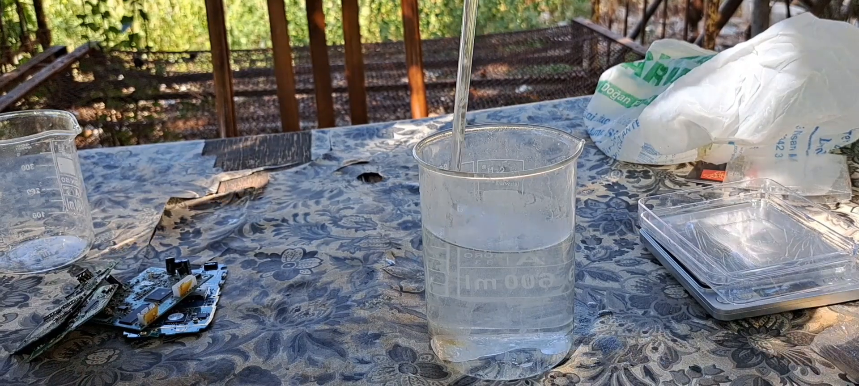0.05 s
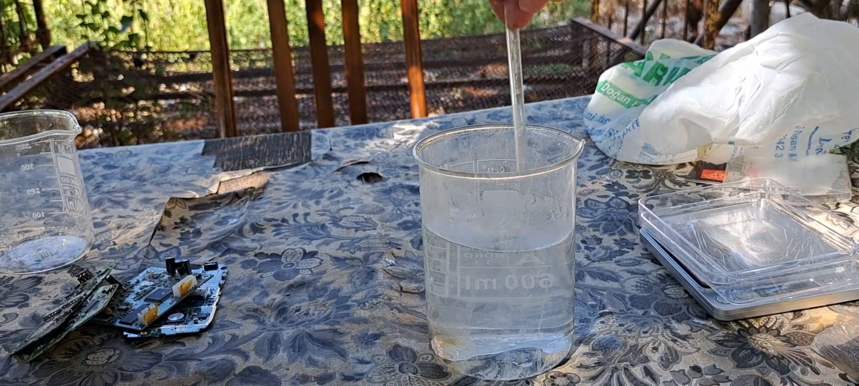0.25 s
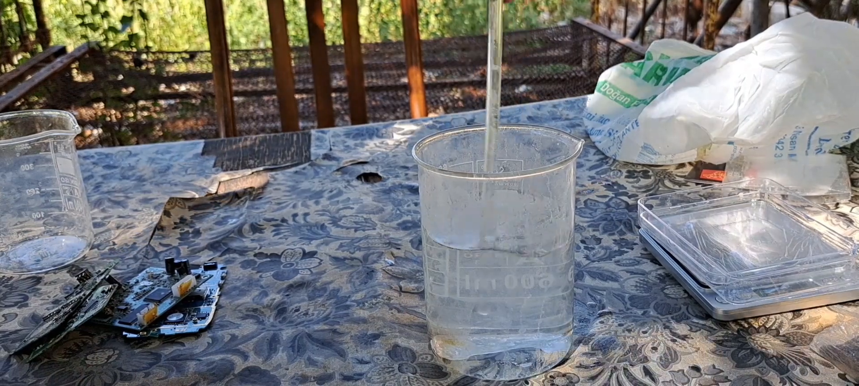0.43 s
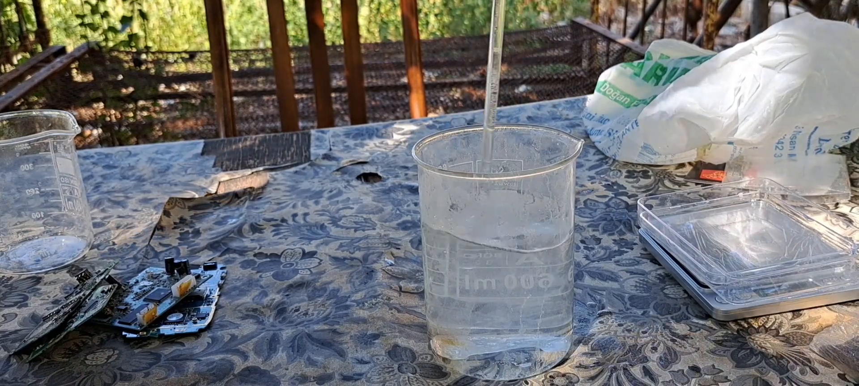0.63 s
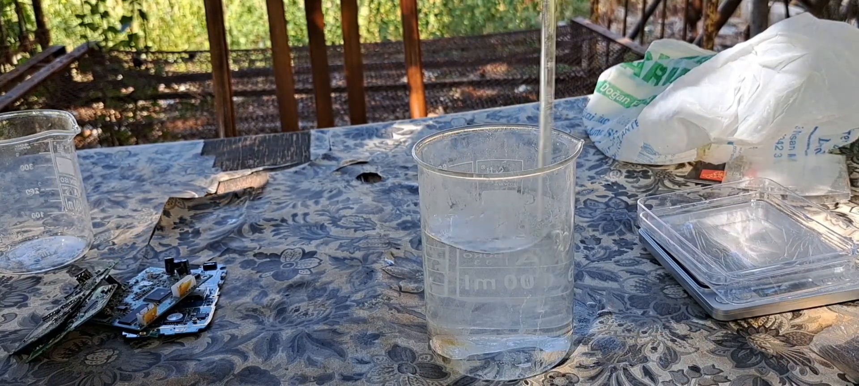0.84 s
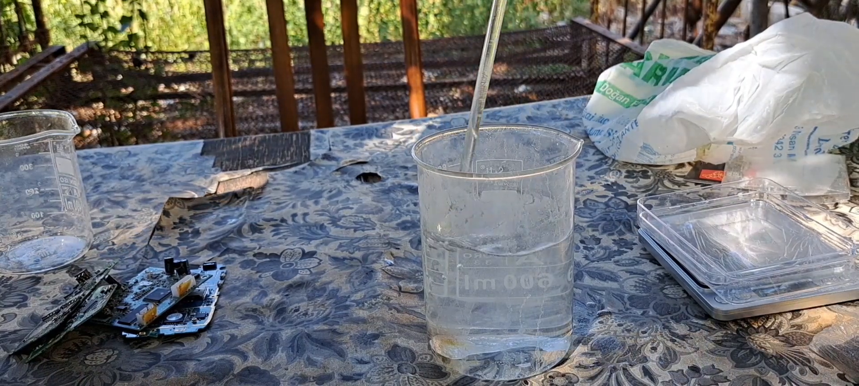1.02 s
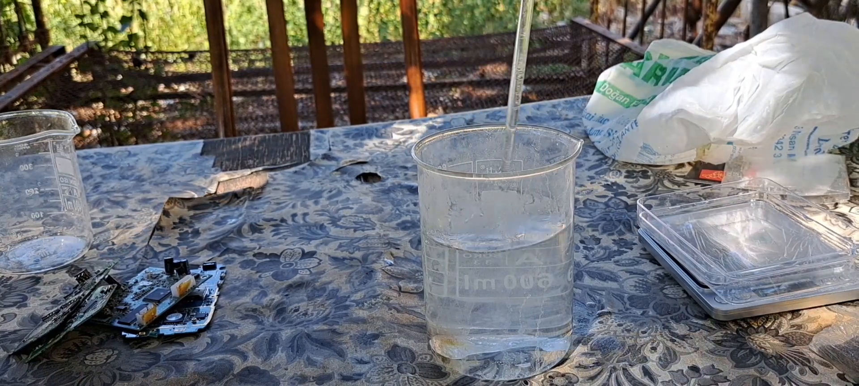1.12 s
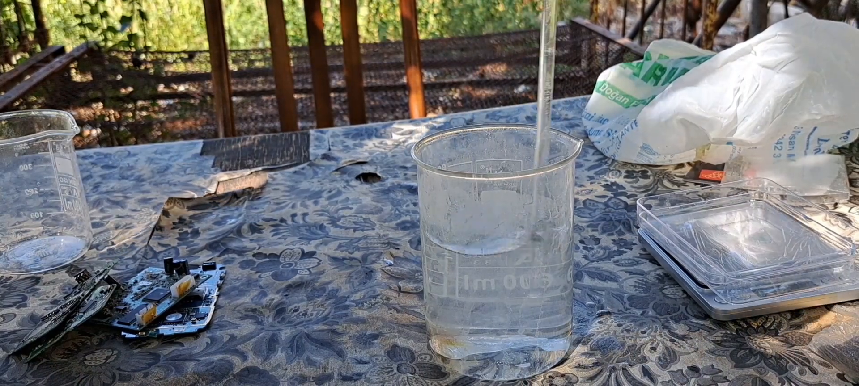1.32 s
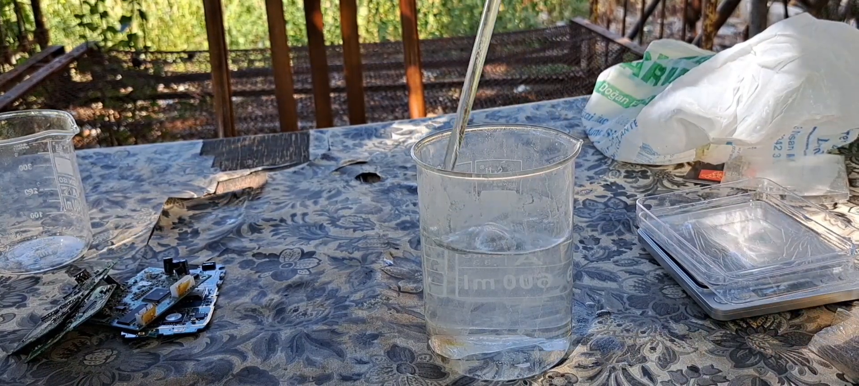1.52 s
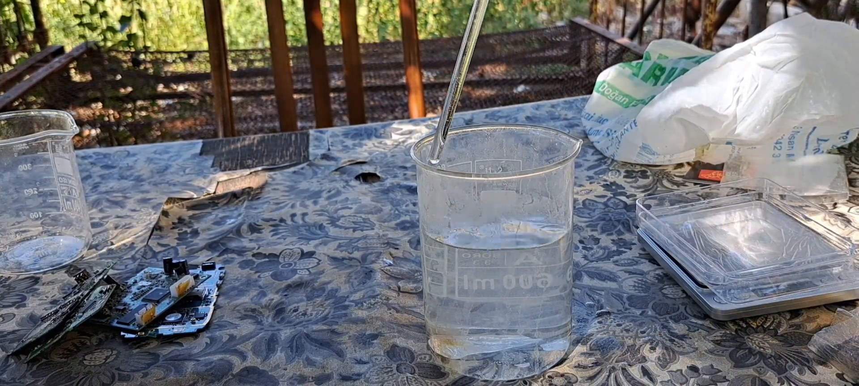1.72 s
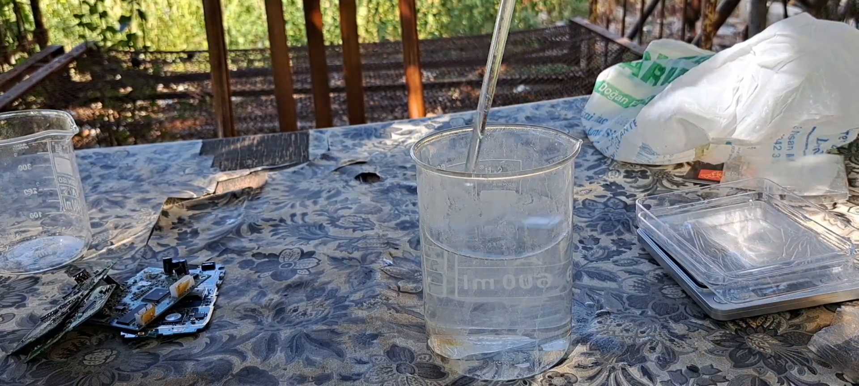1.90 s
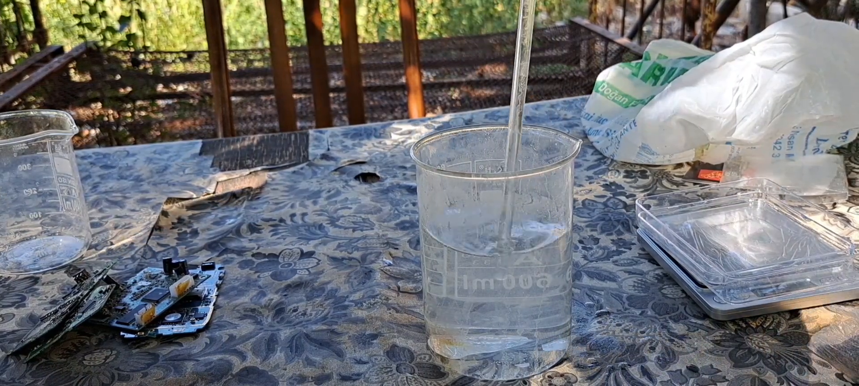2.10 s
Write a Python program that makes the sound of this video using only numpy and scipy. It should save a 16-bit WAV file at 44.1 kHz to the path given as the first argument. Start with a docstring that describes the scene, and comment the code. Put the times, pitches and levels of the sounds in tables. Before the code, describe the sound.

Bright, uneven clinks of a glass rod stirring water in a beaker.

```python
"""An outdoor table: a glass rod stirs water in a glass beaker.
The rod clacks against the wall, bounces and slides along it; the wall rings in close pairs of modes.
The water gurgles once as bubbles ring, and beaker and table give a few dull knocks.
Nearby things scatter a short echo. Rumble, a low hum and a soft hiss lie behind."""
import sys
import numpy as np
from scipy import signal
from scipy.fft import rfft, irfft
from scipy.io import wavfile

SR = 44100
rng = np.random.default_rng(int(sys.argv[2]) if len(sys.argv) > 2 else 0)


def store_wav(level_fs):
    """Save 16-bit WAV to argv[1]."""
    pcm = np.round(np.clip(np.atleast_2d(level_fs), -1, 1) * 32767)
    wavfile.write(sys.argv[1], SR, pcm.T.astype(np.int16))


N = 94815
T = np.arange(int(.8 * SR)) / SR  # time within one event
CONTACT_HZ, CONTACT_ATTACK_S = 7660, 0.00059  # main rod-wall contact mode


def clinks():
    """Each blow of the rod clacks and sets the wall ringing; some add a ping."""
    # t/s; ring: level/dB, tilt/(dB/oct), twin bias/dB, lowest pair/dB, t60 factor;
    # clack: level/dB, tilt/(dB/oct), pitch factor, main mode/dB, snap/dB, t60 factor
    blows = [ (0.2039, -23.5, 6.5, -7.5, -2, 1.3, -5.5, 1.5, 1.014, -7, -6.5, 1),
             (0.2354, -22.5, -3.5, -3.5, -4, 1.3, -8, 1, 1.01, -1, -8, 0.84),
             (0.2473, -29.5, -1, 7, 6.5, 0.92, -22.5, -2, 0.93, 2.5, -11, .9),
             (0.5035, -31.5, -7, 4.5, 2, 1.1, -9.5, 3.5, 0.99, 1.5, -17, 0.56),
             (0.523, -26.5, -2.5, 5.5, -4, 1.25, -10, 0, 1.0, 2.5, -28, 0.8),
             (0.5314, -43, 7, -3.5, -1, 1.1, -22, -1, 0.98, 9.5, -10, 0.49),
             (0.75, -50, -4, 9, -23, 0.56, -43.5, -7, 0.98, 9.5, -4, 1),
             (0.9236, -25.5, 13, 0.5, -1, 0.47, -6, 2, 0.99, -3, -27, 0.75),
             (0.9342, -30, 11, -6, -1, .7, -15.5, -4, 0.99, 2.5, -23, .7),
             (0.9607, -46, -2, -4, -9, 0.5, -38, -4, 1.3, -3, -10, .6),
             (0.981, -31.5, -5.5, -0.5, 8, 0.57, -33, -12.5, 0.95, 9, -19, 0.76),
             (0.986, -31, 6, -1, 2, 0.81, -19, -3.5, 1.01, 7, -21, .7),
             (1.043, -56.5, 17, 4, 9, 0.82, -45, -4, 0.96, 2, -4, .6),
             (1.4245, -32.5, -6.5, 5, 10, 0.51, -28, -5.5, 1.01, -10, 1, .6),
             (1.4453, -33.5, -7.5, -5, 1.5, 0.32, -34.5, -11, 0.9, -17, -6, 0.54),
             (1.4794, -40, 2, 6, -18, 0.48, -30, 2, 0.91, -6, -7, .6),
             (1.483, -22.5, -5.5, 2.5, -29, 0.92, -9, -0.5, .972, -1.5, -6, .8),
             (1.7027, -20.5, 5, 5.5, 0.5, 0.73, -9.5, -1.5, 0.99, -5, -8, 0.74),
             (1.7333, -41, 7, 5, 0, 0.64, -27, -6.5, 1.02, 2, -10, .7),
             (1.7419, -29, -4, -5, -2.5, 0.88, -45, -13.5, 0.87, -6, -11, .8)]
    # pitch set by where the rod touches: t/s, f/Hz, level/dB, t60/s, spread/Hz
    pings = [(.041, 2520, -28, 0.021, 1050), (0.2054, 5690, -18, 0.086, 34), (.2351, 5680, -29, 0.062, 40),
             (0.204, 4090, -23, 0.18, 7.5), (0.7493, 3335, -32, 0.05, 81), (0.749, 5680, -36.5, 0.073, 29),
             (0.987, 4470, -27.5, 0.18, 13), (1.2483, 13800, -29.5, .012, 1300),
             (1.3947, 7540, -39, 0.023, 700), (1.4248, 8780, -18.5, 0.016, 270),
             (1.4446, 3406, -29.5, 0.057, 67), (1.4451, 8700, -25, .022, 400),
             (1.483, 4970, -12, 0.024, 40), (1.484, 7050, -20.5, 0.083, 43),
             (1.482, 11900, -14.5, 0.023, 510), (1.7018, 5820, -23, .05, 120),
             (1.7021, 8120, -12.5, 0.034, 320), (1.7027, 3272, -24.5, 0.15, 18.4)]
    out = np.zeros(N)
    for s, ring_db, tilt_db_oct, twin_db, lowest_db, t60_factor, clack_db, *clack_timbre in blows:
        ring = wall_ring(tilt_db_oct, twin_db, lowest_db, t60_factor)
        add(out, s, from_db(ring_db) * choked(s, ring))
        add(out, s, from_db(clack_db) * clack(*clack_timbre))
    for s, hz, db, t60_s, spread_hz in pings:
        add(out, s, from_db(db) * cluster(hz, spread_hz, envelope(CONTACT_ATTACK_S, t60_s)))
    return out


def wall_ring(tilt_db_oct, twin_db, lowest_db, t60_factor):
    """Long modes of the beaker wall; the place of the blow favours one twin of each pair."""
    # f/Hz, base level/dB, base t60/s, twin (sign says which of the pair a blow favours, 0 single)
    modes = [(1643.4, -20.5, 0.76, -1), (1661.6, -25, 0.73, 1), (2657, -24, 0.24, 0),
             (3152, -11.5, 0.28, -1), (3173, -5, 0.23, 1), (3251, -6.5, 0.11, 0), (4063, -13, 0.17, 0),
             (4395, -4.5, 0.16, -1), (4450, -6.5, 0.15, 1), (5340, -15.5, 0.12, -0.089),
             (5728, -16, 0.18, 0), (5810, -16.5, 0.12, 0.11), (7480, -12, 0.13, -1), (7440, -15, 0.088, 1)]
    pivot_hz, tilt_top_hz = modes[4][0], 4900
    out = np.zeros(N)
    for k, (hz, db, t60_s, twin) in enumerate(modes):
        is_lowest = k < 2
        attack_s = 0.0047 if is_lowest else 0.0013  # the lowest pair swells in more slowly
        shape = envelope(attack_s, t60_s * t60_factor)
        octaves = np.log2(min(hz, tilt_top_hz) / pivot_hz)
        gain = from_db(db + tilt_db_oct * octaves + twin_db * np.sign(twin) + lowest_db * is_lowest)
        add(out, 0, gain * shape * np.sin(2 * np.pi * hz * T[:len(shape)]))
    return out[:len(T)]


def clack(tilt_db_oct, pitch_factor, main_db, snap_db, t60_factor):
    """Glass on glass: crowded modes that drop fast, plus a broadband snap."""
    # rod and wall in contact, base values: f/Hz, level/dB, t60/s, spread/Hz
    modes = [(950, -32.5, 0.021, 496), (1963, -25.5, 0.046, 350), (3102, -20, 0.037, 276),
             (4337, -14.5, 0.06, 200), (5297, -10.5, 0.057, 350), (5780, -12, 0.14, 199),
             (6350, -19, .035, 220), (7465, 0, 0.057, 204), (8120, -11, 0.06, 540), (9687, 0, 0.036, 150),
             (10430, -7, 0.052, 180), (11280, -17.5, 0.04, 230), (11970, -16, 0.048, 340),
             (13520, -12, 0.017, 470), (15380, -21.5, 0.014, 360)]
    hold_s, drop_t60_s, drop_floor = 0.0017, 0.012, 0.42
    out = np.zeros(len(T))
    for hz, db, t60_s, spread_hz in modes:
        is_main = abs(hz - CONTACT_HZ) < 400
        gain = from_db(db + tilt_db_oct * np.log2(hz / CONTACT_HZ) + main_db * is_main)
        shape = envelope(CONTACT_ATTACK_S, t60_s * t60_factor, hold_s)
        add(out, 0, gain * cluster(hz * pitch_factor, spread_hz, shape))
    out *= drop_floor + (1 - drop_floor) * decay(T, drop_t60_s, hold_s)
    snap_shape = envelope(CONTACT_ATTACK_S / 2, t60_s=0.0062, hold_s=hold_s / 2)
    snap = rms_one(signal.sosfilt(butter([4640, 13500], "band", order=4), rng.standard_normal(len(T))))
    add(out, 0, from_db(snap_db) * snap_shape * snap[:len(snap_shape)])
    return out


def choked(start_s, ring):
    """Each later press of the rod damps the ringing wall."""
    # t/s, loss/dB
    presses = [(1.465, 7.5), (1.745, 9.5)]
    ramp_s = 0.0076
    for s, loss_db in presses:
        if s > start_s:
            ring = ring * from_db(-loss_db * np.clip((start_s + T - s) / ramp_s, 0, 1))
    return ring


def slides():
    """The sliding rod catches and slips, driving the glass with dense small taps."""
    # t/s, length/s, rub level/dB, rub tilt/(dB/oct), ring level/dB, ring tilt/(dB/oct)
    strokes = [(0.647, 0.078, -51, 2, -56.5, -12), (.747, 0.017, -49.5, -1.5, -46.5, -6),
               (0.805, 0.049, -39, -4, -41, -13), (0.937, 0.043, -45, 0, -41.5, -2),
               (0.979, 0.012, -28, 0, -32, -15), (1.03, 0.24, -56.5, 10, -80, -1),
               (1.106, 0.049, -51, 8, -69, -6), (1.26, 0.044, -51.5, 4, -67, 4),
               (1.312, 0.014, -43, 0, -55, -1), (1.429, 0.067, -37.5, -3, -39, -3),
               (1.487, 0.016, -31.5, -2, -36, -8), (2.02, 0.071, -55.5, -1, -74, -3)]
    # resonances excited by sliding: f/Hz, base level/dB, t60/s, spread/Hz
    rub_modes = [(5340, -3, 0.031, 265), (5810, -10.5, 0.034, 150), (7480, -0.5, 0.045, 260),
                 (8570, -2.5, .02, 740), (10170, -4.5, 0.026, 170), (10220, -3, 0.045, 230),
                 (12400, -7, 0.022, 870), (13750, -10, .03, 290)]
    slips_per_s, slip_spread_db = 900, 5
    out = np.zeros(N)
    for s, length_s, rub_db, rub_db_oct, ring_db, ring_db_oct in strokes:
        arch = np.sqrt(np.sin(np.pi * np.minimum(T / length_s, 1)).clip(0))
        slips = arch * (rng.random(len(T)) < slips_per_s / SR)
        slips *= from_db(slip_spread_db * rng.standard_normal(len(T)))
        rub = np.zeros(len(T))
        for hz, db, t60_s, spread_hz in rub_modes:
            gain = from_db(db + rub_db_oct * np.log2(hz / CONTACT_HZ))
            add(rub, 0, gain * cluster(hz, spread_hz, envelope(CONTACT_ATTACK_S, t60_s)))
        ring = wall_ring(ring_db_oct, twin_db=3.2, lowest_db=-20.5, t60_factor=0.61)
        for db, response in (rub_db, rub), (ring_db, ring):
            scrape = signal.fftconvolve(slips, response)[:len(T)]
            stroke_rms = np.sqrt(np.sum(scrape ** 2) / (length_s * SR) + 1e-12)
            add(out, s, from_db(db) * choked(s, scrape) / stroke_rms)
    return out


def bubbles():
    """Bubbles in the rod's wake ring briefly, rising in pitch as they near the surface."""
    # t/s, start f/Hz, level/dB, t60/s, rise/(oct/s)
    wake = [(.892, 1830, -42, 0.06, 11.5), (0.896, 1448, -49, 0.21, 4.8), (0.919, 1360, -39, .05, 3.4),
            (.935, 1150, -34, 0.079, 27), (0.944, 1850, -39, 0.056, 4), (.955, 1646, -28.5, 0.043, 14),
            (0.98, 1820, -28, 0.036, 8.5), (.986, 882, -33, 0.12, 1.3), (1.132, 1697, -42.5, 0.069, 2.3)]
    out = np.zeros(N)
    for s, start_hz, db, t60_s, rise_oct_s in wake:
        shape = envelope(attack_s=0.0015, t60_s=t60_s, hold_s=0.0015)
        hz = start_hz * 2 ** (rise_oct_s * T[:len(shape)])
        add(out, s, from_db(db) * shape * np.sin(2 * np.pi * np.cumsum(hz) / SR))
    return out


def knocks():
    """Low, heavily damped bumps of beaker and table."""
    # t/s, f/Hz, level/dB, t60/s
    bumps = [(.042, 283, -22, 0.021), (.056, 149, -23.5, 0.043), (.152, 436, -28, .04),
             (.167, 432, -30, 0.068), (.173, 132, -30.5, 0.044), (.238, 403, -33.5, 0.052),
             (0.523, 405, -36, 0.097), (.95, 454.7, -41, 0.13), (1.425, 365.3, -33, 0.16),
             (1.426, 690, -36.5, 0.095), (1.446, 463, -34.5, 0.1), (1.435, 156, -39, 0.077),
             (1.484, 386, -33.5, 0.088), (1.484, 700, -41, 0.062), (1.715, 300, -39.5, 0.058),
             (1.78, 348, -28.5, 0.028)]
    out = np.zeros(N)
    for s, hz, db, t60_s in bumps:
        shape = envelope(attack_s=0.0012, t60_s=t60_s, hold_s=0.0012)
        add(out, s, from_db(db) * cluster(hz, spread_hz=0.14 * hz, shape=shape))
    return out


def reflections(x, level_db=-18.5):
    """Short scatter from table, railing and nearby things."""
    shape = envelope(attack_s=0.0062, t60_s=0.12)
    tail = shape * rng.standard_normal(N)[:len(shape)]
    return from_db(level_db) * signal.fftconvolve(x, tail / np.sqrt(np.sum(tail ** 2)))[:N]


def outdoor_air():
    """Steady rumble under a hiss that starts louder and brighter, then settles."""
    # noise spectrum: f/Hz, relative level/dB
    spectrum = [(18, -59), (30, -8), (75, -2), (157, -12), (355, -10.5), (384, -12), (512, -11.5),
                (1160, -19.5), (3140, -24), (3400, -24), (6900, -23.5), (7470, -23), (8520, -25.5),
                (10200, -24.5), (16000, -27)]
    # hiss contour: t/s, lift/steps
    contour = [(0, 12), (.06, 12), (.12, 9), (.18, 9), (.25, 7.5), (.36, 1), (.6, -1.5), (1.2, -0.5),
               (1.6, 0.5), (1.85, 1), (2.15, 1)]
    mid_db_per_step, treble_db_per_step = 0.79, 1.31
    bins_hz = np.maximum(np.fft.rfftfreq(N, 1 / SR), 1)
    points_hz, levels_db = np.transpose(spectrum)
    colour = from_db(np.interp(np.log(bins_hz), np.log(points_hz), levels_db))
    air = from_db(-47.5) * rms_one(irfft(rfft(rng.standard_normal(N)) * colour, N))
    air = signal.sosfilt(butter(58, "high"), air)
    hiss = signal.sosfiltfilt(butter(94, "high"), air)
    treble = signal.sosfiltfilt(butter(4200, "high"), air)
    rumble, mid = air - hiss, hiss - treble
    lift = np.interp(np.arange(N) / SR, *np.transpose(contour))
    return rumble + mid * from_db(mid_db_per_step * lift) + treble * from_db(treble_db_per_step * lift)


def hum(hz=74, level_db=-58, waver_depth=0.19):
    """A low tone whose level wavers slowly."""
    waver = rms_one(signal.sosfilt(butter(5, "low"), rng.standard_normal(N + SR))[SR:])
    tone = np.sqrt(2) * np.sin(2 * np.pi * hz * np.arange(N) / SR)
    return from_db(level_db) * (1 + waver_depth * waver) * tone


def cluster(hz, spread_hz, shape, count=7):
    """Close modes that share one envelope and beat."""
    modes_hz = hz + spread_hz * (2 * (np.arange(count) + rng.random(count)) / count - 1)
    cycles = modes_hz[:, None] * T[:len(shape)] + rng.random((count, 1))
    tone = np.sin(2 * np.pi * cycles).sum(0) * shape
    return tone * np.sqrt(.5 * np.sum(shape ** 2) / np.sum(tone ** 2))


def envelope(attack_s, t60_s, hold_s=0):
    """Rise, hold, decay to -120 dB."""
    t = T[:int((hold_s + 2 * t60_s) * SR) + 2]
    return (1 - np.exp(-t / attack_s)) * decay(t, t60_s, hold_s)


def decay(t, t60_s, hold_s):
    return np.exp(-np.log(1000) * np.maximum(t - hold_s, 0) / t60_s)


def butter(edge_hz, kind, order=2):
    return signal.butter(order, edge_hz, kind, fs=SR, output="sos")


def from_db(db):
    return 10 ** (np.asarray(db) / 20)


def rms_one(x):
    return x / np.sqrt(np.mean(x ** 2) + 1e-20)


def add(out, start_s, sound):
    i = int(np.clip(start_s * SR, 0, N - 1))
    out[i:i + len(sound)] += sound[:N - i]


def scene():
    """Beaker, water and table in the open air; mono."""
    background = outdoor_air() + hum()
    near = knocks() + bubbles() + slides() + clinks()
    return (near + reflections(near) + background)[None]


def record(dry):
    """Peak clip, then steep low-pass."""
    cutoff_hz = 15750
    lowpass = signal.ellip(10, .1, 80, cutoff_hz, fs=SR, output="sos")
    return signal.sosfilt(lowpass, np.clip(dry, -.9, .9))


dry = scene()
out = record(dry)
store_wav(out)
```